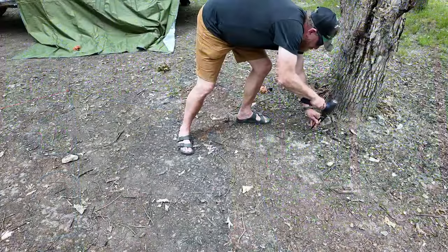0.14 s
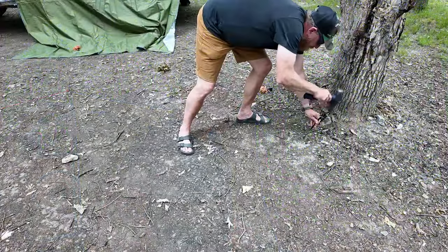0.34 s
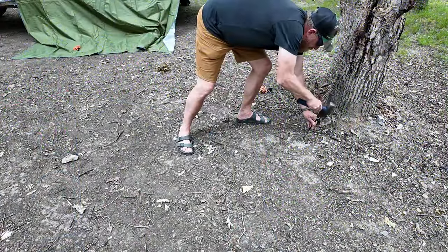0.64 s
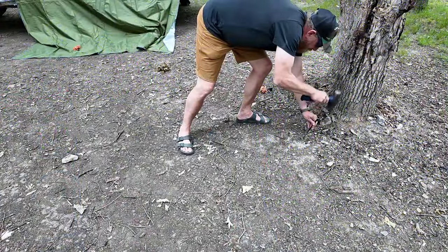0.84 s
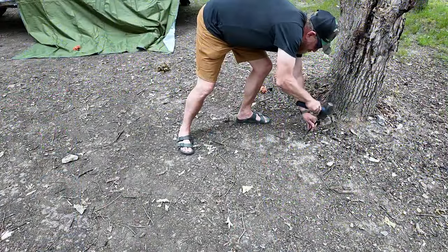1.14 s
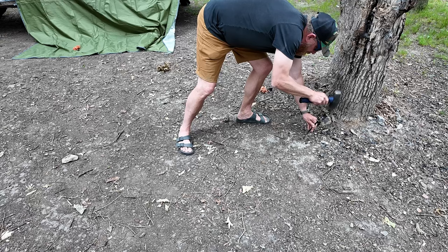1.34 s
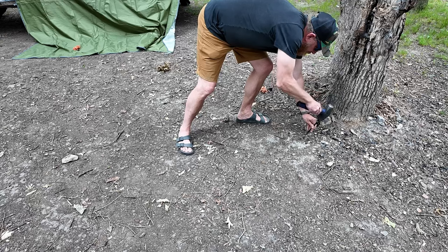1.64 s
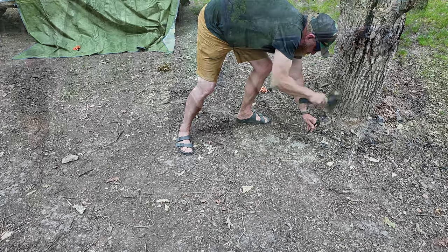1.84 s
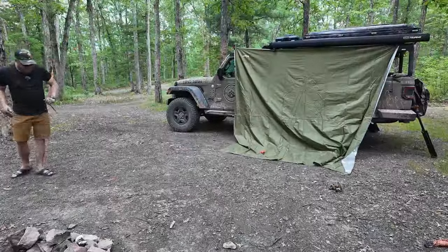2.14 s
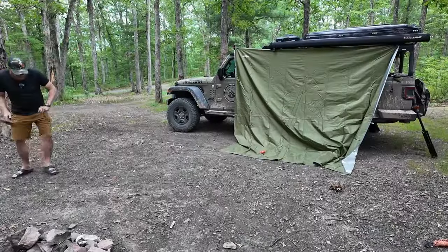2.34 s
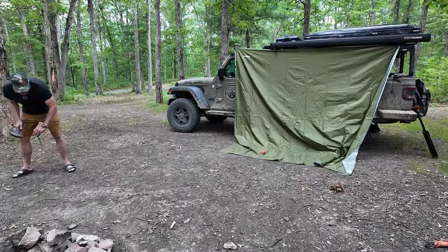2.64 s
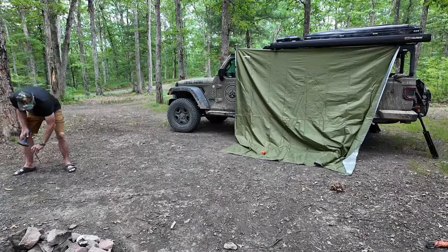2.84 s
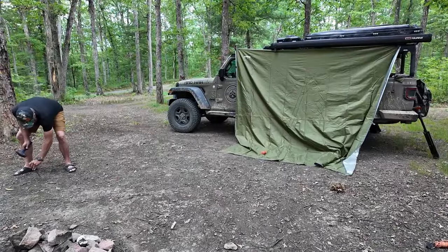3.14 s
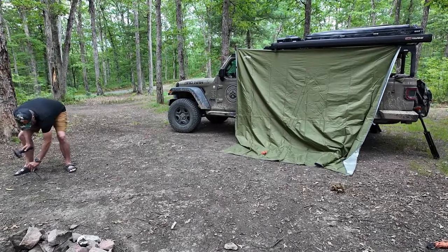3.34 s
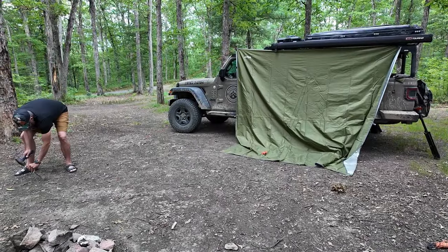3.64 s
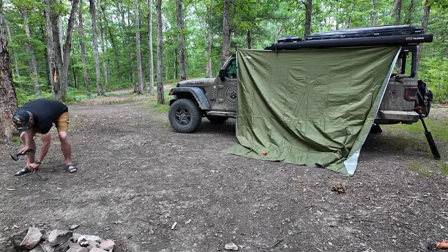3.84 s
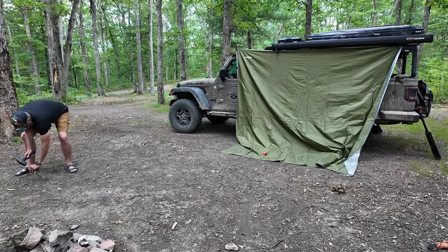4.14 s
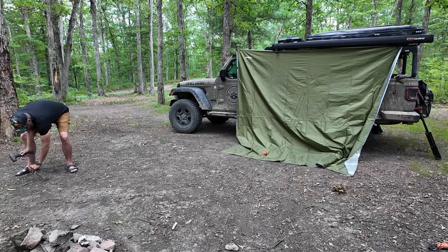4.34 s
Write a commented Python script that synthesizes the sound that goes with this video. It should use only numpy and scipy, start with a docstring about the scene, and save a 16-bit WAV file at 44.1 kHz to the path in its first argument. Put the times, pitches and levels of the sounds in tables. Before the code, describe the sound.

Four evenly spaced hammer cracks on a steel tent stake, a crunchy scuffle over dirt and litter, then two further strikes in quiet woods.

```python
"""Forest floor, two spots: a small sledgehammer drives a steel tent stake into soil. Four blows, a walk
over grit and leaves, two more blows. Chatter keeps the stake's modes ringing while it slides, then the
soil grips it dead; scattered taps give the faint tail of the trees. Footfalls and litter are thumps,
ticks and resonated grainy noise; the air is patchy noise coloured per spot. A distant engine, a wavering
sine, swells in at the second spot."""
import sys
import numpy as np
from scipy import signal
from scipy.fft import rfft, irfft
from scipy.io import wavfile
from scipy.ndimage import uniform_filter1d

SR = 44100
rng = np.random.default_rng(int(sys.argv[2]) if len(sys.argv) > 2 else 0)


def file_out(sig):
    """Save sig as 16-bit WAV at sys.argv[1]."""
    # one column per channel
    cols = np.atleast_2d(sig).T
    # limit, then scale
    lim = np.clip(cols, -1, 1)
    pcm = np.round(lim * 32767).astype(np.int16)
    wavfile.write(sys.argv[1], SR, pcm)


N = 197523  # samples

# air colour, one list per spot: (frequency [Hz], relative density [dB per Hz])
AIR_COLOURS = [
    [(15, -63.5), (25, -39.5), (65, 3), (134, -12.5), (172, -4), (272, -8.5), (312, -3.5), (481, -14),
     (522, -9.5), (1030, -21), (1630, -31.5), (5690, -29), (14300, -53), (16400, -53.5)],
    [(15, -48), (25, -21.5), (87, -5.5), (131, -2), (197, -2.5), (272, -3), (723, -5.5), (1350, -20.5),
     (2080, -20.5), (4830, -29), (5690, -30), (6690, -33.5), (15100, -48.5), (16400, -47)],
]
# air loudness: (time [s], level [dB])
AIR_LEVEL = [(0.0, -57.5), (1.9, -58), (2.26, -53), (2.66, -58), (3.03, -53), (3.23, -57), (4.07, -61.5),
             (4.48, -61)]
# microphone self-noise: (frequency [Hz], spectral gain [dB])
SELF_NOISE = [(1000, -95.5), (6000, -80.5), (12000, -90), (16000, -93.5)]
# returns from the trunks: (frequency [Hz], t60 [s], relative level [dB])
TRUNK_RETURNS = [(296.2, 0.24, -15), (1010, 0.21, 3), (2300, 0.7, -3.5), (3980, 0.69, -4),
                 (5670, 0.16, 5.5), (8100, 0.63, -1), (10700, 0.8, -9), (12300, 0.98, -3.5),
                 (14000, 0.69, -16)]
# slow shuffle of feet and gear in the litter: (time [s], body level [dB], treble level [dB])
SHUFFLE = [(1.974, -61.5, -76), (2.159, -75, -85.5), (2.3, -75, -72), (2.43, -49.5, -63),
           (2.53, -60, -75.5), (2.66, -55, -71), (2.75, -56.5, -67.5), (2.83, -55, -65), (2.97, -52, -56.5),
           (3.12, -54, -59), (3.25, -58.5, -64.5), (3.45, -67, -73.5), (3.8, -68, -80.5),
           (3.972, -65.5, -63), (4.1, -71, -81.5), (4.3, -60, -79), (4.38, -66, -63.5), (4.48, -65.5, -69)]
# short scrapes: (time [s], level [dB], fall constant [s], lower crunch [Hz], upper re lower crunch [dB])
SHORT_SCRAPES = [(2.266, -51.5, 0.032, 1620, -3), (2.407, -47, 0.034, 1480, 0.5),
                 (2.579, -54, 0.024, 1500, 15), (2.605, -38, 0.015, 1650, -15),
                 (2.629, -40, 0.004, 1470, -16), (2.651, -36.5, 0.0068, 1430, -8),
                 (2.681, -54, 0.021, 1230, -21), (2.834, -46, 0.0036, 1220, -1),
                 (2.864, -44, 0.04, 1280, 7.5), (2.88, -41, 0.012, 1180, 0), (2.899, -38, 0.0094, 940, -2),
                 (2.94, -32.5, 0.019, 880, 2.5), (3.489, -58, 0.013, 1500, 6), (3.904, -58, 0.1, 1460, 12),
                 (3.944, -58, 0.014, 1493, 6), (4.392, -57.5, 0.046, 1500, 12)]
# upper crunch of a scrape and its treble: (frequency [Hz], width [Hz], relative level [dB])
UPPER_CRUNCH = [(3070, 2500, -0.7), (5300, 2900, -15.5)]
# dull thumps of feet, handle and settling soil: (time [s], level [dB], frequency [Hz])
DULL_THUMPS = [(0.323, -42.5, 300), (0.83, -41.5, 336), (1.233, -29, 163), (1.726, -11.5, 282),
               (2.956, -32.5, 220), (3.198, -33, 196), (4.187, -35.5, 261), (4.324, -41.5, 261)]
# ticks of grit, twigs and metal: (time [s], level [dB], ring [Hz], ring t60 [s], snap drive re ring [dB])
GRIT_TICKS = [(.037, -50, 5560, 0.0027, 9.5), (.116, -49.5, 2400, 0.0069, -6),
              (1.727, -26, 2200, 0.011, 11), (2.155, -31, 935, 0.015, -4.5),
              (2.276, -38.5, 5200, 0.037, 7.5), (2.312, -43.5, 2780, 0.0076, 9),
              (2.339, -41.5, 2900, 0.0048, 7.5), (2.439, -30.5, 2370, 0.0073, 6),
              (2.452, -24.5, 2450, .008, 9.5), (2.505, -42.5, 2070, 0.014, 8),
              (2.544, -44.5, 1660, 0.012, 14), (2.585, -46, 7000, 0.0048, -7),
              (2.651, -25, 1570, 0.0018, 10), (2.71, -13, 2900, 0.0015, -4), (2.734, -36, 2460, 0.0052, -6),
              (2.898, -14.5, 970, 0.0085, 7), (2.961, -21.5, 3150, 0.0023, -8.5),
              (3.408, -44.5, 2360, 0.007, 0), (4.157, -26.5, 2166, .016, 0.5)]
# blows: (time [s], slide [s], fade over the slide [dB], strength [dB], thud [dB], knock [dB], treble [dB],
#         lingering ring [dB], tree tail [dB], soil thump [dB], head ping [dB])
HAMMER_BLOWS = [(0.2491, 0.022, 16, -17.5, 2.5, 0.5, 1.5, -60, -31, -28, -57),
                (0.7128, 0.022, 7, -19.5, -1, 1, 3.5, -67.5, -29, -30.5, -70),
                (1.19, 0.0085, 2, -16.5, -10.5, -8, -3.5, -76.5, -27.5, -30, -78.5),
                (1.6766, 0.0079, 4, -16, -2, -4, -1, -74, -29, -25, -60.5),
                (3.6786, 0.02, 16.5, -17.5, -5, 2.5, 3.2, -59, -33.5, -41.5, -85),
                (4.1381, 0.01, 1, -19, -11, 0.5, 3, -57, -29, -35, -90)]
# path from a blow to the microphone: (frequency [Hz], first spot [dB], second spot [dB])
BLOW_PATH = [(310, -6.5, -16.5), (514, -3.5, -40), (760, 8, -0.5), (1200, -19.5, -25.5), (1836, -9.5, -4.5),
             (2420, -1, -11), (2930, -7, -11.5), (3840, -5.5, 5.9), (3600, -4.5, 1), (4440, -6.5, -13.5),
             (5800, -9.5, -15.5), (8500, -13, -9), (9260, -13.5, -19), (13600, -27, -27)]
# bending and lengthwise modes of the stake: (frequency [Hz])
STAKE_MODES_HZ = [312, 510, 690, 825, 930, 1170, 1660, 1860, 2110, 2220, 2370, 2550, 2760, 3005, 3570, 3800,
                  4050, 4600, 5180, 5690, 5920, 6620, 6840, 7700, 8060, 8780, 9850, 10750, 11400, 13600]
# strength of those modes, same order: (relative level [dB])
STAKE_MODES_DB = [5.5, -7, -11, -6.5, -4, -7.5, 2, -7.5, -20, 8, -6, -5, -1.5, -1.5, -0.5, -1, -6, -4.5,
                  -3.5, -1.5, 2, -1, -5, 0.5, -2.5, -6.5, 5, -1, -3.5, 0]
# decay of the modes while sliding: (frequency [Hz], t60 [s])
SLIDING_T60 = [(300, 0.54), (1000, 0.3), (2300, 0.033), (6000, 0.012), (13000, 0.014)]
# lingering ring of the free end: (frequency [Hz], width [Hz], first spot [dB], second spot [dB])
FREE_END_MODES = [(3660, 130, 2, 4), (5150, 80, -0.5, -5), (5700, 200, 8.5, 3.5), (7800, 220, 8, -6),
                  (8103, 150, -7.5, 4.5), (9600, 120, -5, 3), (10700, 150, -8.5, -4)]

MOVE_S = 1.975  # from here on, the second spot
EDGE_HZ, NEAR_HIGHPASS_HZ = 16500, 150
HUM_HZ, HUM_DB, HUM_SWELL_S = 146.5, -64.5, 0.79
HUM_WAVER_DB, HUM_WAVER_HZ = 4, 12.0
CRUNCH_HZ, CRUNCH_RISE_HZ_PER_S, CRUNCH_TOP_HZ = 2100, 630, 3240  # brightens as the feet come to leaves
LITTER_TOP_HZ = 11500
RISE_SHARE = 0.15  # rise constant of a scrape / fall constant
LOWER_WIDTH_SHARE = 1  # width of the lower crunch / its frequency
THUMP_T60_S = 0.023
SNAP_SPAN_HZ = 2100  # low-pass of a tick, above its ring
THUD_HZ, KNOCK_HZ, TREBLE_HZ = 600, 1400, 4400  # edges of the parts that differ from blow to blow
CRACK_DB, CRACK_FALL_S = 2.5, 0.0016  # extra push of the first contact
GRIP_EASE_S, GRIP_LAG_S = 0.0011, 0.002
GRIP_HZ, GRIP_T60_S = 306, 0.037
FREE_T60_S = 0.38
HEAD_HZ, HEAD_T60_S = 12020, 0.36


def amp(db):
    """Gain of a level in dB."""
    return 10 ** (np.asarray(db) / 20)


def evened(x):
    """Scales to rms 1."""
    return x / np.sqrt(np.mean(x ** 2) + 1e-20)


def read(points, hz):
    """Reads a spectrum on a log-frequency axis."""
    f, value = np.transpose(points)
    return np.interp(np.log(hz + 1), np.log(f + 1), value)


def add(mix, s, sound):
    """Adds a sound at time s, cut at the end of the mix."""
    part = mix[round(s * SR):][:len(sound)]
    part += sound[:len(part)]


def mode(x, hz, t60):
    """Damped two-pole resonator: a unit click rings with initial height 1."""
    r = np.exp(-np.log(1000) / (max(t60, 1e-3) * SR))
    w = 2 * np.pi * hz / SR
    return signal.lfilter([0, np.sin(w)], [1, -2 * r * np.cos(w), r * r], x)


def resonate(x, hz, width):
    """Resonance of gain 1 following the curve hz: shift to 0 Hz, low-pass, shift back."""
    turn = np.exp(2j * np.pi * np.cumsum(hz * np.ones(len(x))) / SR)
    r = np.exp(-np.pi * width / SR)
    return 2 * (turn * signal.lfilter([1 - r], [1, -r], x / turn)).real


def crunch(x, hz, width):
    """Steep resonance of the litter: three resonators in series, rms 1."""
    twice = resonate(resonate(x, hz, width), hz, width)
    return evened(resonate(twice, hz, 2 * width))


def thump(db, hz, t60):
    """One low mode with a soft start."""
    t = np.arange(6000) / SR
    envelope = amp(db - 60 * t / t60) * (1 - np.exp(-t / 0.0021))
    return envelope * 2 * np.sin(2 * np.pi * hz * t)


def air():
    """Noise with randomly patchy spectra; the colour switches with the spot."""
    hop, size = 256, 1024
    frames, hz = N // hop + 5, np.fft.rfftfreq(size, 1 / SR)
    real, imag, patches = rng.standard_normal((frames, len(hz), 3)).T
    patches = uniform_filter1d(patches, size=10, axis=0)  # over frequency
    patches = evened(uniform_filter1d(patches, size=12, axis=1))  # over time
    band = (hz > 100) & (hz < 1200)  # both colours are equally strong here
    first, second = [amp(read(w, hz)) / np.linalg.norm(amp(read(w, hz))[band]) for w in AIR_COLOURS]
    colour = np.where(np.arange(frames) * hop / SR < MOVE_S, first[:, None], second[:, None])
    spectra = (real + 1j * imag) * colour * amp(1.4 * patches)
    wash = signal.istft(spectra, nperseg=size, noverlap=size - hop)[1][:N]
    t = np.arange(N) / SR
    return evened(wash) * amp(np.interp(t, *np.transpose(AIR_LEVEL)))


def hum():
    """Distant engine: a sine that swells in at the second spot, its level wavering at random."""
    t = np.arange(N) / SR
    lowpass = signal.butter(2, HUM_WAVER_HZ, fs=SR)
    waver = evened(signal.lfilter(*lowpass, rng.standard_normal(N)))
    swell = np.clip((t - MOVE_S) / HUM_SWELL_S, 0, 1)
    level = np.sqrt(2 * swell) * amp(HUM_DB + HUM_WAVER_DB * waver)
    return level * np.sin(2 * np.pi * HUM_HZ * t)


def trees(x):
    """Scattered returns from trunks: sparse taps that swell, then die band by band."""
    taps = np.zeros(SR)
    at = np.arange(400, SR - 20, 20) + rng.integers(0, 20, (SR - 401) // 20)
    taps[at] = rng.choice([-1., 1.], at.shape)
    hz, t, z = signal.stft(taps, SR, nperseg=256)
    t60, db = (read([(row[0], row[k]) for row in TRUNK_RETURNS], hz)[:, None] for k in (1, 2))
    envelope = amp(db - 60 * t / t60) * (1 - np.exp(-t / 0.0014))
    tail = signal.istft(z * envelope, SR, nperseg=256)[1]
    return signal.fftconvolve(x, tail / np.linalg.norm(tail))


def grit(count, grain):
    """Two unrelated hisses (body, treble) that share sparse larger grains."""
    size = amp(4.05 * np.minimum(rng.exponential(1, count), 5))
    grains = size * (rng.random(count) < 300 / SR)  # about 300 per second
    return rng.standard_normal((2, count)) * (1 + grain * uniform_filter1d(grains, size=40))


def shuffle():
    """Feet and gear in the litter: grit through a rising crunch resonance and a treble one."""
    t = np.arange(N) / SR
    s, body_db, treble_db = np.transpose(SHUFFLE)
    hz = np.clip(CRUNCH_HZ + CRUNCH_RISE_HZ_PER_S * (t - MOVE_S), CRUNCH_HZ, CRUNCH_TOP_HZ)
    body, treble = grit(count=N, grain=9.9)
    out = amp(np.interp(t, s, body_db)) * crunch(body, hz, 3080)
    out += amp(np.interp(t, s, treble_db)) * crunch(treble, 6230, 4200)
    return out * (t > MOVE_S)


def scrape(db, fall, lower_hz, upper_db):
    """A short burst of grit through a lower and an upper crunch resonance."""
    t = np.arange(5000) / SR
    body, treble = grit(count=len(t), grain=12.4)
    shape = (1 - np.exp(-t / (RISE_SHARE * fall))) * np.exp(-t / fall)
    lower = crunch(body, lower_hz, LOWER_WIDTH_SHARE * lower_hz)
    upper = sum(amp(band_db) * crunch(treble, hz, width) for hz, width, band_db in UPPER_CRUNCH)
    sound = (lower + amp(upper_db) * upper) / np.hypot(1, amp(upper_db))
    return amp(db) * shape / shape.max() * sound


def litter():
    """Shuffle and scrapes, dulled by a low-pass."""
    out = shuffle()
    for s, *settings in SHORT_SCRAPES:
        add(out, s, scrape(*settings))
    return signal.sosfilt(signal.butter(3, LITTER_TOP_HZ, fs=SR, output="sos"), out)


def tick(db, hz, t60, snap_db):
    """A differenced noise snap plus a short sine ring, low-passed above the ring."""
    t = np.arange(6000) / SR
    burst = rng.standard_normal(len(t)) * np.exp(-t / 0.0009) * amp(snap_db)
    ring = amp(-60 * t / t60) * np.sin(2 * np.pi * hz * t)
    dull = signal.butter(6, hz + SNAP_SPAN_HZ, fs=SR, output="sos")
    return amp(db) * signal.sosfilt(dull, ring + np.diff(burst, prepend=0))


def knocks():
    """Places the dull thumps and the ticks."""
    out = np.zeros(N)
    for s, db, hz in DULL_THUMPS:
        add(out, s, thump(db, hz, THUMP_T60_S))
    for s, *settings in GRIT_TICKS:
        add(out, s, tick(*settings))
    return out


def stake_modes(path, t, slide):
    """Stake modes, each struck once and kept going by random chatter."""
    sound = np.zeros(len(t))
    for hz, db in zip(STAKE_MODES_HZ, STAKE_MODES_DB):
        chatter = 0.09 * rng.standard_normal(len(t))
        chatter[int(rng.uniform(0, 20))] += rng.choice([-1, 1])  # the strike
        ring = mode(chatter, hz, read(SLIDING_T60, hz))
        sound += amp(db + read(path, hz)) * ring / np.std(ring[t < slide])
    return sound


def shaft_scrape(path, count):
    """Soil scraping along the shaft: noise shaped by the path to the microphone."""
    hz = np.fft.rfftfreq(count, 1 / SR)
    gain = amp(read(path, hz) - 0.5) * (hz > 250) / (1 + (hz / 14500) ** 16)
    return irfft(rfft(rng.standard_normal(count)) * gain)


def free_end(ring_db, spot):
    """Lingering ring of the free end: noise through narrow resonances, decaying."""
    t = np.arange(SR // 2) / SR
    shiver = rng.standard_normal(len(t))
    ring = np.zeros(len(t))
    for row in FREE_END_MODES:
        hz, width = row[:2]
        ring += amp(row[spot + 1]) * evened(resonate(resonate(shiver, hz, width), hz, width))
    return amp(ring_db - 60 * t / FREE_T60_S) * ring


def head_ping(db):
    """Ping of the hammer head: a decaying sine."""
    t = np.arange(SR // 2) / SR
    return amp(db - 60 * t / HEAD_T60_S) * np.sin(2 * np.pi * HEAD_HZ * t)


def blow(s, slide, fade_db, strength_db, thud_db, knock_db, treble_db, ring_db, tail_db, thump_db, head_db):
    """One impact, then chatter that keeps the modes going until the soil grips the stake."""
    t = np.arange(SR // 10) / SR
    spot = 1 if s < MOVE_S else 2
    path = []
    for row in BLOW_PATH:
        hz, db = row[0], strength_db + row[spot]
        db += thud_db * (hz < THUD_HZ) + knock_db * (THUD_HZ < hz < KNOCK_HZ) + treble_db * (hz > TREBLE_HZ)
        path.append((hz, db))
    grip = 1 / (1 + np.exp(np.clip((t - slide) / GRIP_EASE_S, -50, 50)))  # mutes within a few ms
    push = amp(CRACK_DB * np.exp(-t / CRACK_FALL_S) - fade_db * t / slide)
    stake = stake_modes(path, t, slide)
    soil = shaft_scrape(path, len(t))
    direct = (stake + soil) * push * grip
    to_trunks = 0.17 * direct + 5.4 * soil * push * grip  # the trunks hear more of the scrape
    out = amp(tail_db) * trees(to_trunks)
    add(out, 0, direct)
    add(out, slide + GRIP_LAG_S, thump(thump_db, GRIP_HZ, GRIP_T60_S))  # soil grips the stake
    add(out, 0, free_end(ring_db, spot))
    add(out, 0, head_ping(head_db))
    return out


def scene():
    """Near sounds, thin in the deep bass at this distance, over air and hum."""
    near = knocks() + litter()
    for row in HAMMER_BLOWS:
        add(near, row[0], blow(*row))
    near = signal.sosfilt(signal.butter(3, NEAR_HIGHPASS_HZ, "highpass", fs=SR, output="sos"), near)
    return (near + air() + hum())[None]


def record(dry):
    """Faint microphone self-noise, a soft knee on the highest peaks, then the band limit."""
    gain = amp(read(SELF_NOISE, np.fft.rfftfreq(N, 1 / SR)))
    hiss = irfft(rfft(rng.standard_normal(N)) * gain, N)
    heard = dry + hiss
    kneed = heard / (1 + (abs(dry) / 0.93) ** 6) ** (1 / 6)
    lowpass = signal.firwin(511, EDGE_HZ, window=("kaiser", 9), fs=SR)
    return signal.oaconvolve(kneed, lowpass[None], "same")


dry = scene()
out = record(dry)
file_out(out)
```